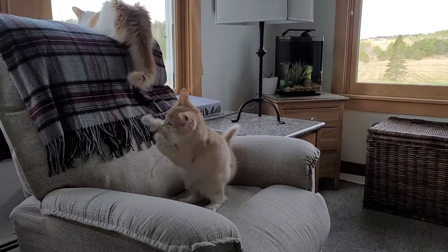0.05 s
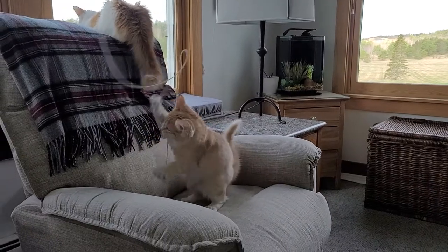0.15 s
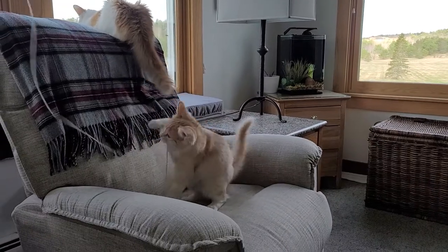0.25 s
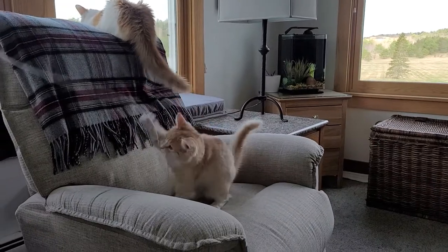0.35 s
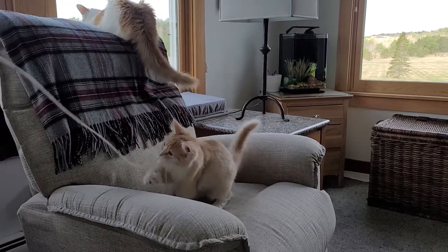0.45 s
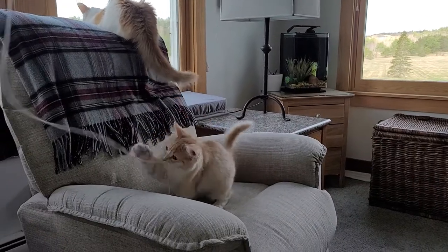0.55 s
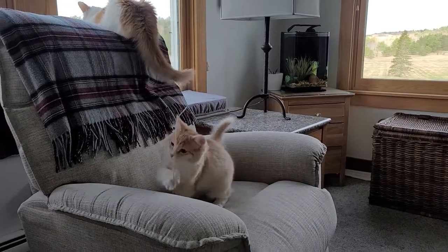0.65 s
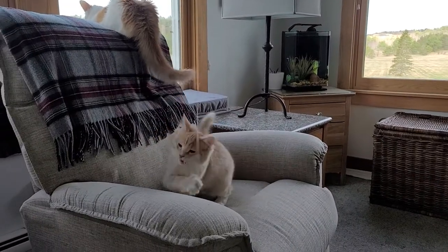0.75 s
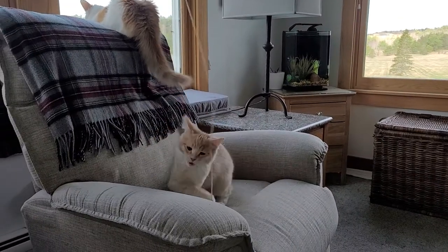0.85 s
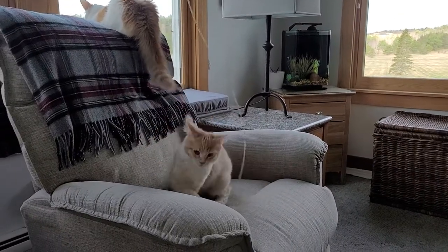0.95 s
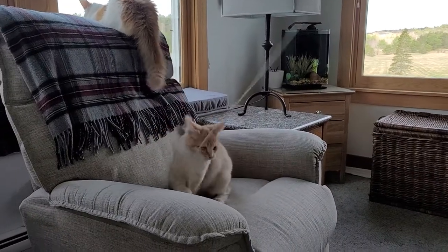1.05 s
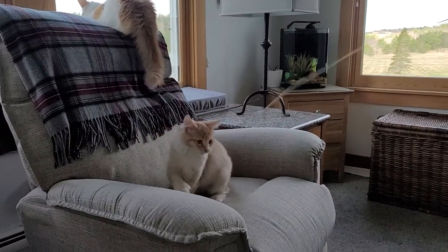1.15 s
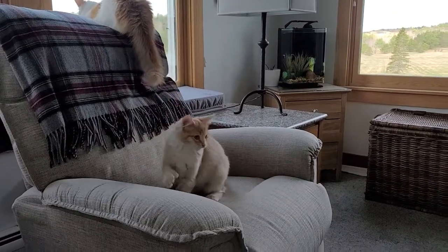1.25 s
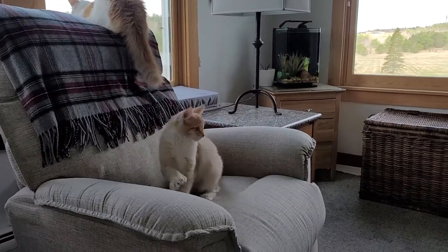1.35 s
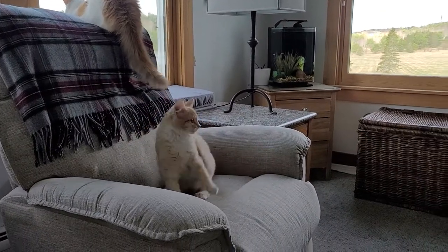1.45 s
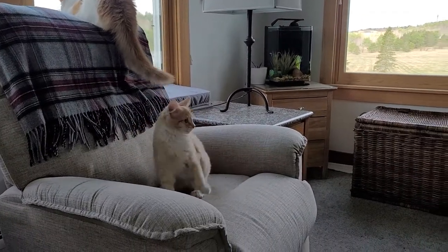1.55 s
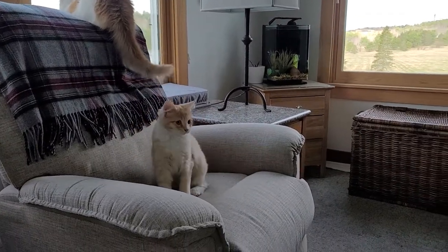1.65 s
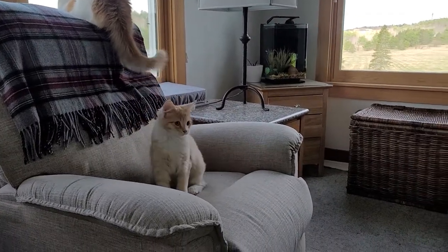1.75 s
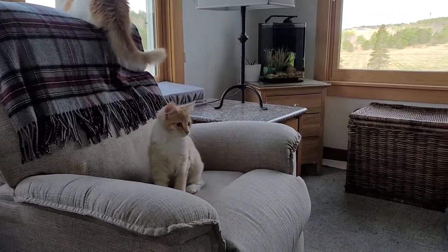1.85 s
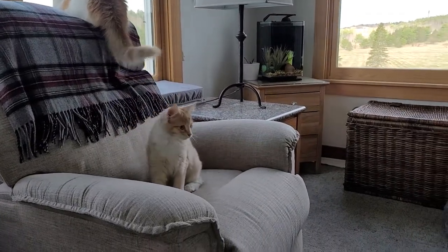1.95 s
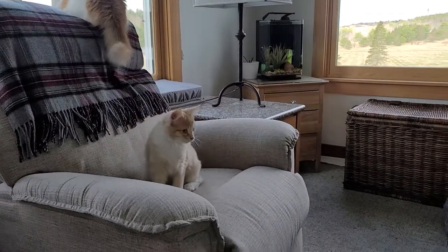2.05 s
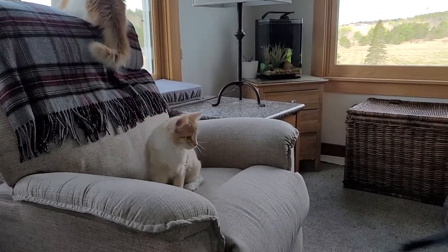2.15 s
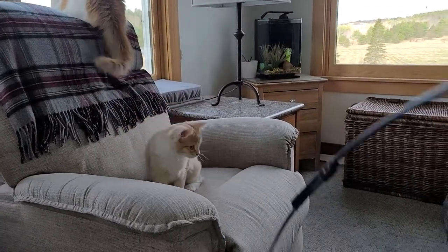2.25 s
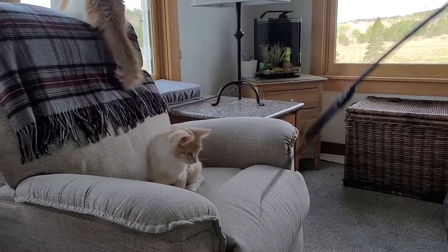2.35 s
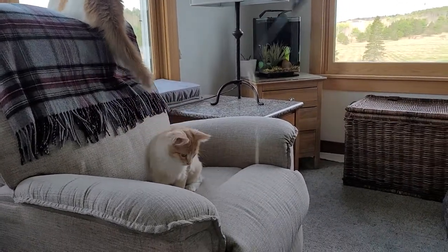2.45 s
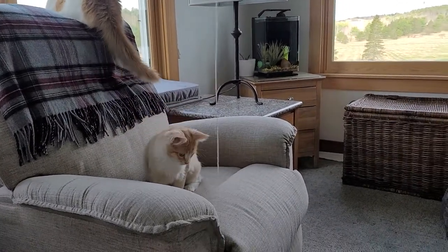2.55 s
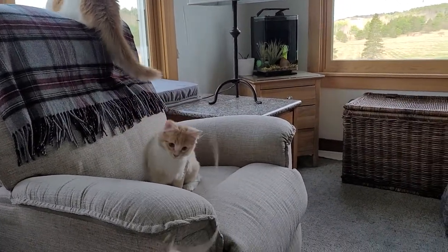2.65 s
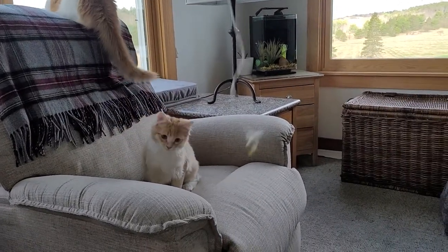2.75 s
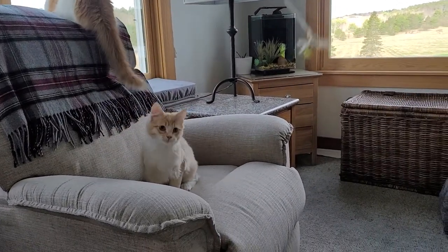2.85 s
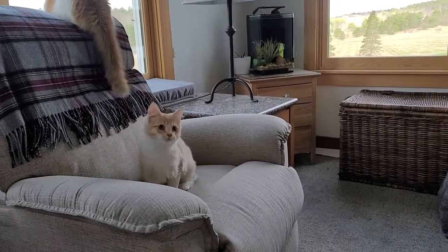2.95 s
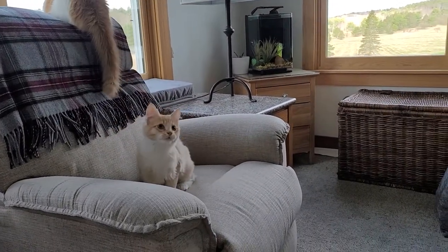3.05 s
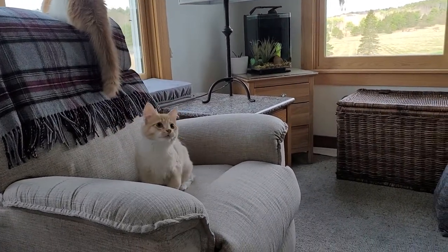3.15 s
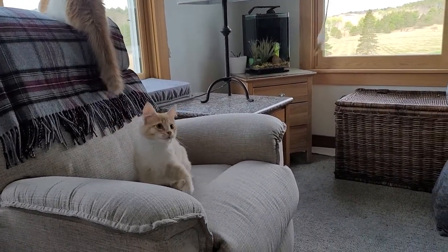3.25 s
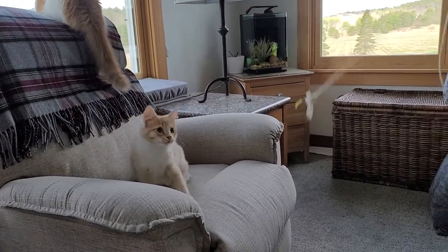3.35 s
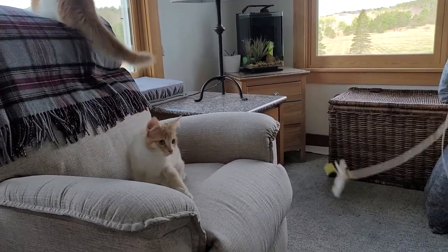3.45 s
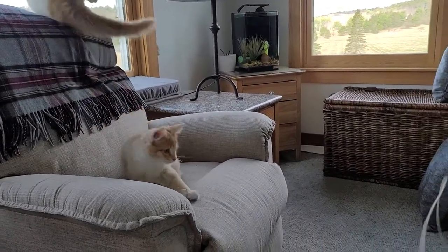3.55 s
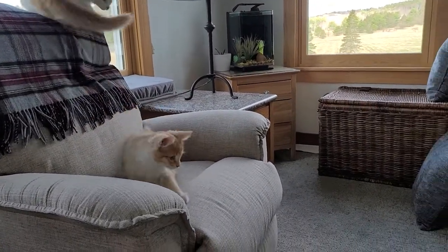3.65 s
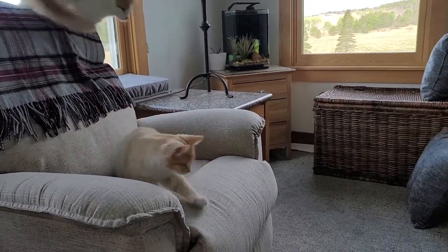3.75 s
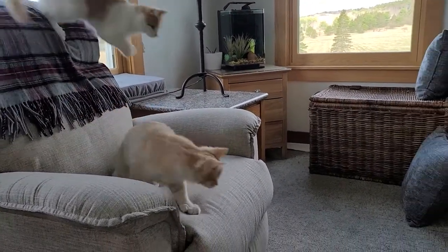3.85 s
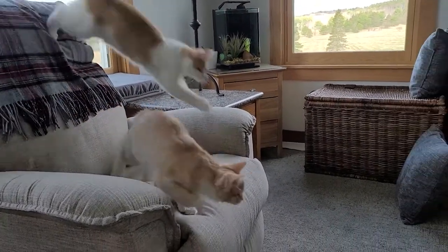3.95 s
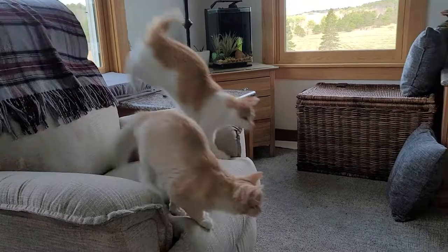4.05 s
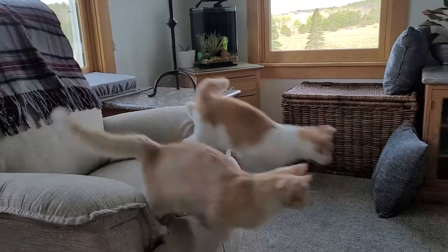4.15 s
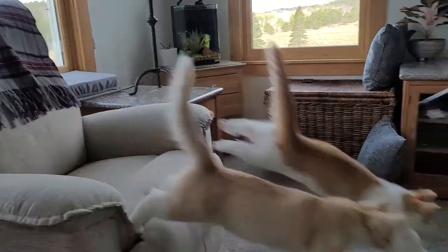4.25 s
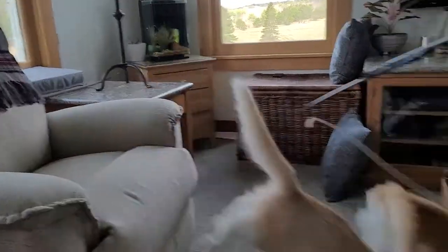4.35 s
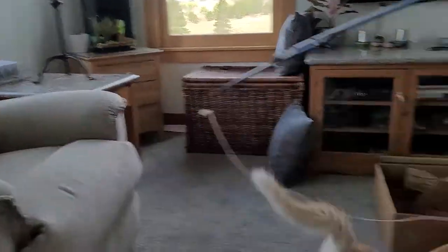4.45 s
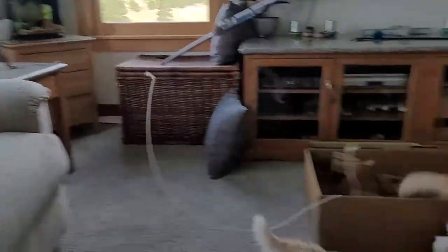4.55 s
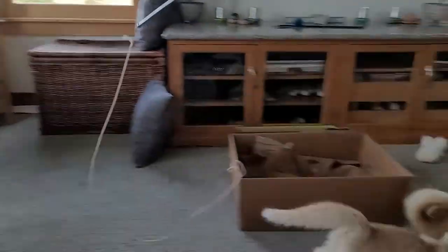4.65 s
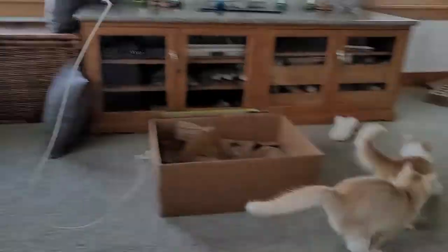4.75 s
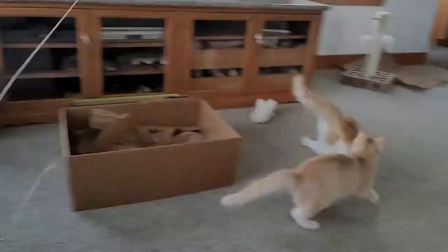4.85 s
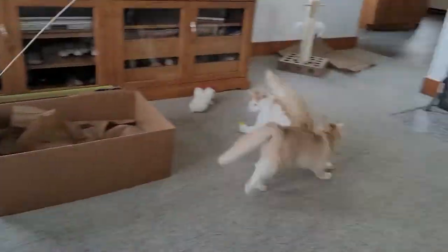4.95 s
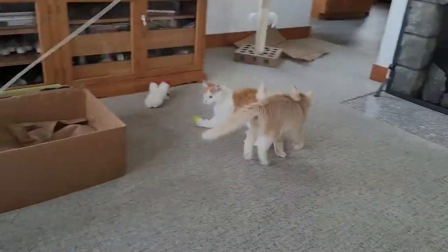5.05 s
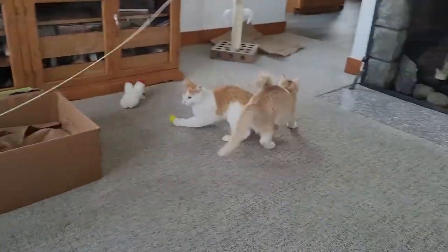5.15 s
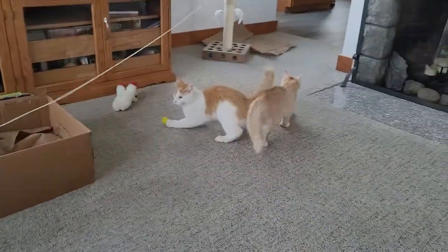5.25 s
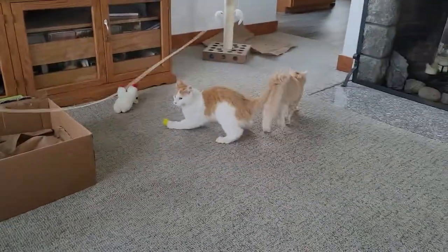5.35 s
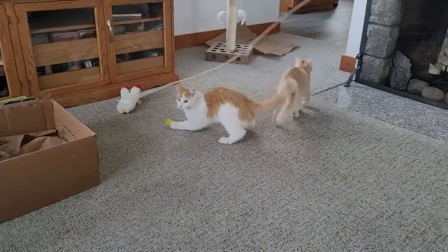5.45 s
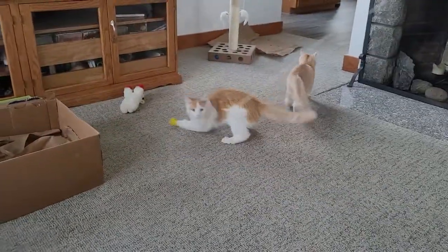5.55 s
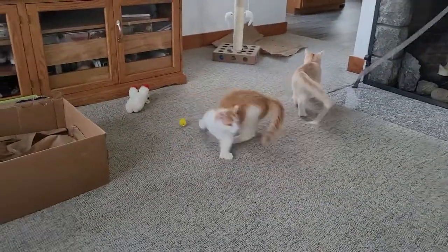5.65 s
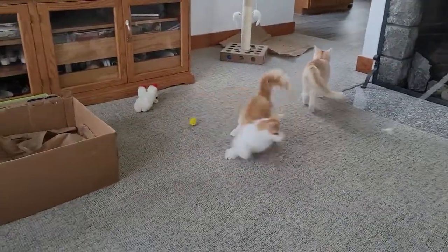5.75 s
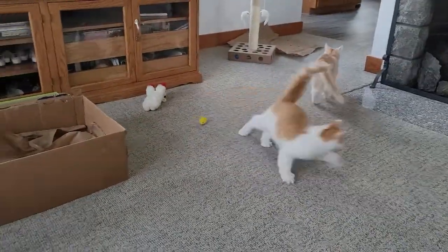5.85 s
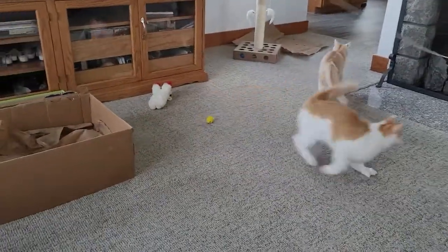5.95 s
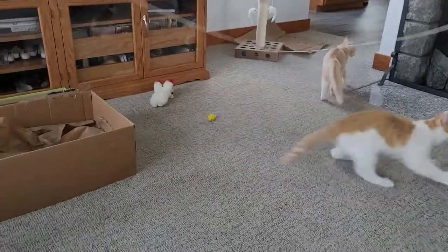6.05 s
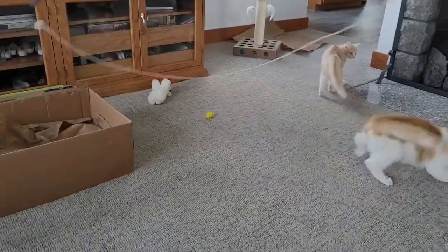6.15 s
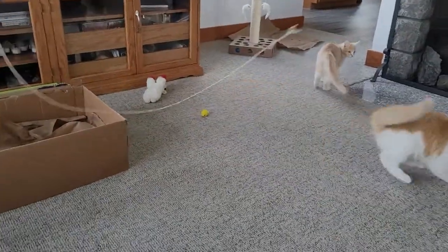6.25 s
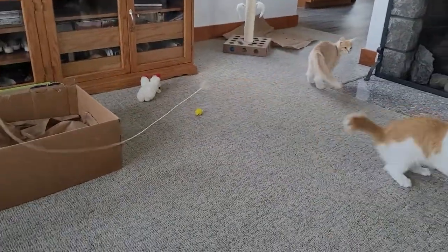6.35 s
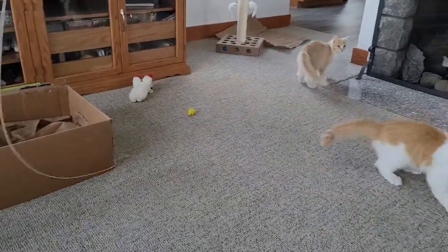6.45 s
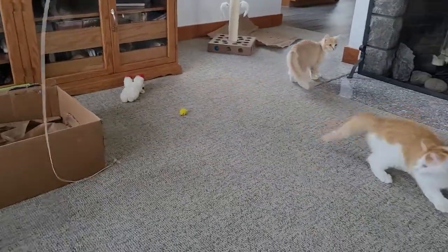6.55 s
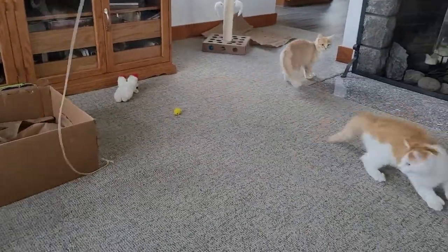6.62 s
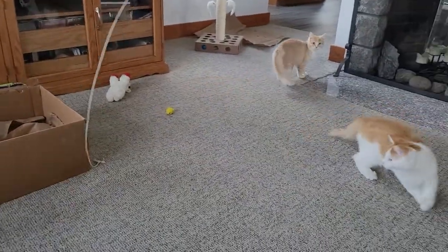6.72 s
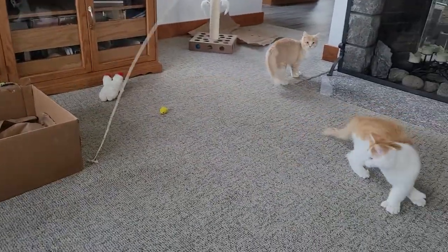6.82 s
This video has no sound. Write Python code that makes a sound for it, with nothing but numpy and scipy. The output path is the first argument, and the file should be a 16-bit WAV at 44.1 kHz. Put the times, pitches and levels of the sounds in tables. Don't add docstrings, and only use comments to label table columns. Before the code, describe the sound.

A low pump hum and soft hiss, a wand toy snapping on an armchair, then two cats leaping with knocks, scuffs and heavy carpet thumps.

```python
import sys
import numpy as np
from scipy import signal
from scipy.fft import rfft, irfft, next_fast_len
from scipy.io import wavfile
from scipy.ndimage import uniform_filter1d

SR = 44100
rng = np.random.default_rng(int(sys.argv[2]) if len(sys.argv) > 2 else 0)


def transcribe(u):
    v = np.clip(np.atleast_2d(u).T, -1, 1)
    q = np.round(v * 32767).astype(np.int16)
    wavfile.write(sys.argv[1], SR, q)


def volts(x):
    e = np.asarray(x, float) / 20
    return 10 ** e


N = 303628
TIME = np.arange(N) / SR
PORT_LAG_MS = 0.42

# (t/s, peak level/dB, f/Hz, ring/cycles)
ON_CHAIR = [(1.194, -40, 85.2, 4.05), (1.571, -43, 88.7, 9.1), (2.236, -32, 278, 15.8),
            (2.297, -21.5, 86, 5), (2.304, -35.5, 201, 7.5), (2.68, -27, 214, 3.4), (2.685, -35.5, 86, 3.2),
            (3.828, -37, 135.5, 3.3), (3.859, -41.5, 80, 3.33), (4.067, -29, 99, 3.6), (4.1, -30, 82, 3.9),
            (4.167, -22, 91.2, 3.2), (4.198, -18, 81.95, 2.64), (4.289, -20, 89, 2.6)]
# (t/s, peak level/dB, f/Hz, ring/cycles)
ON_FLOOR = [(4.39, -21.5, 37.2, 2.6), (4.42, -19.5, 55.2, 5.8), (4.462, -24, 55, 2),
            (4.483, -20.5, 119, 2.3), (4.495, -13.5, 148, 3.8), (4.511, -21.5, 64.8, 5),
            (4.565, -15, 121, 4.3), (4.59, -16, 86, 2.5), (4.608, -28, 110, 6), (4.64, -27, 84, 19),
            (4.679, -23, 214, 5.7), (4.709, -21.5, 58, 3), (4.728, -31.5, 134, 7.4),
            (4.806, -35.5, 56.5, 4.4), (4.828, -32, 152, 2.4), (4.857, -28, 68, 2.6), (4.988, -40, 76, 11),
            (5.239, -46, 253, 6), (5.265, -47, 88.5, 5), (5.322, -47.5, 80, 7.9), (5.608, -40, 81.9, 5.3),
            (5.736, -38.5, 70.4, 4), (5.75, -42, 129, 13), (5.772, -36, 64, 3), (5.788, -41, 62, 4),
            (5.882, -32.5, 278.5, 10.7), (5.903, -34, 213.6, 8.8), (5.97, -35, 60, 4.4),
            (6.074, -32, 70, 2), (6.089, -27.5, 71.9, 3.2), (6.131, -26, 95.5, 2.5),
            (6.16, -31.5, 70.5, 1.8), (6.174, -28, 68.6, 3.9), (6.132, -34.5, 287, 11),
            (6.528, -34, 73.5, 2.4), (6.544, -37, 75.4, 3.1), (6.57, -45, 90, 4.9)]


def unit(x):
    return x / np.sqrt(np.mean(x ** 2))


def on_log(table, hz):
    f, v = np.transpose(table)
    return np.interp(np.log(np.maximum(hz, 1)), np.log(f), v)


def curves(rows):
    s, *columns = np.transpose(rows)
    return [np.interp(TIME, s, c) for c in columns]


def band(x, lo_hz, hi_hz, order=2):
    sos = signal.butter(order, [lo_hz, min(hi_hz, 0.45 * SR)], "band", fs=SR, output="sos")
    return signal.sosfilt(sos, x)


def diffuse(size, colour=((20, 0), (20000, 0))):
    # (f/Hz, left-right correlation)
    likeness = [(60, 0.42), (130, 0.87), (290, 0.12), (640, -0.42), (1400, -0.47), (3100, -0.16),
                (15000, -0.18)]
    fast = next_fast_len(size, True)
    hz = np.fft.rfftfreq(fast, 1 / SR)
    like = np.clip(on_log(likeness, hz), -0.99, 0.99)
    mid, side = rfft(rng.standard_normal((2, fast))) * volts(on_log(colour, hz))
    mid = mid * np.sqrt((1 + like) / 2)
    side = side * np.sqrt((1 - like) / 2)
    return irfft(np.array([mid + side, mid - side]), fast)[:, :size]


def walk(rate):
    k = int(SR / rate)
    steps = np.repeat(rng.standard_normal(N // k + 1), k)
    return 1.22 * uniform_filter1d(uniform_filter1d(steps, k), k)[:N]


def add(track, s, sound):
    i = int(s * SR)
    track[i:i + len(sound)] += sound[:N - i]


def add_swell(power, s, db, rise_s, fall_s):
    rise_s, fall_s = np.clip(rise_s, 0.003, 0.3), np.clip(fall_s, 0.01, 0.6)
    t = np.arange(-2 * rise_s, 2 * fall_s, 1 / SR)
    below_peak_db = 30 * np.where(t < 0, -t / rise_s, t / fall_s)
    add(power, s - 2 * rise_s, volts(db - below_peak_db) ** 2)


def thumps():
    out, t = np.zeros(N), np.arange(SR // 4) / SR
    for s, db, hz, cycles in list(ON_CHAIR) + list(ON_FLOOR):
        turns = hz * t
        shape = (1 - np.exp(-turns / 0.29)) * np.exp(-3 * turns / np.clip(cycles, 1, 12))
        add(out, s, volts(db) * shape * np.sin(2 * np.pi * turns * (1 - 0.055 * t)))
    return out


def scuffs():
    # (peak t/s, level/dB, rise by 30 dB/s, fall by 30 dB/s, brightness/dB per layer)
    pawing = [(3.825, -47, -0.1, 0.5, 1), (4.02, -54.5, 0.5, 0.3, 3), (4.07, -40, -0.8, 0.5, -6),
              (4.11, -37.5, 0.1, 1, 1.5), (4.388, -32, -0.35, .17, -0.5), (4.48, -32.5, -0.86, 0.1, -2),
              (4.555, -29, 0, 0.34, -1), (4.685, -36, -1, 0.15, 0), (4.806, -39, -0.3, 0.18, -4),
              (4.911, -47.5, 0, -1.5, 1.5), (4.991, -51, 0.7, 0.47, 5.5), (5.217, -50.5, 0.5, -0.14, -2),
              (5.737, -46.5, 0, 2, -1), (5.8, -54.5, -0.5, 6, 5), (5.885, -47.5, -1.5, 7, 2),
              (6.072, -53, -3, -2.5, -1), (6.14, -44.5, -2.3, -0.47, -0.5), (6.17, -42.5, 4, -0.13, -2),
              (6.515, -53, 0.2, .25, 3.5)]
    clawing = [(2.66, -44, 0.011, 0.033, -2), (2.673, -44, 0.0066, 0.029, 7.5),
               (2.683, -35.5, 0.0072, 0.06, 0), (2.709, -46, 0.02, 0.053, -11),
               (4.13, -47.5, 0.086, 0.17, -1), (4.205, -35.5, 0.049, .2, -2.5),
               (4.25, -36.5, 0.035, 0.14, 1.5), (4.278, -32.5, 0.038, 0.17, -0.5),
               (5.612, -48.5, 0.01, 0.11, -33), (5.935, -53.5, 0.01, 0.18, -2.5),
               (5.745, -54, 0.024, 0.068, -9)]
    scraping = [
        (3.892, -55.5, 0.0083, 0.16, 3.5),
        (4.485, -60.5, 0.045, 0.21, 4.5),
        (4.575, -54.5, .03, 0.52, 2.5),
        (4.706, -47.5, 0.024, 0.15, 1),
        (5.268, -49, 0.016, 0.1, -2.5),
        (5.285, -48, 0.027, 0.15, -6),
        (5.61, -49.5, 0.0073, 0.15, 2.5),
        (6.14, -63, 0.03, 0.23, 2),
    ]
    whipping = [
        (2.225, -52, 0.066, .05, -1.5),
        (2.242, -32.5, 0.016, 0.17, -0.84),
        (2.33, -64, 0.047, 0.082, -7),
        (2.56, -58, 0.21, 0.36, -8),
        (5.255, -66, 0.028, 0.1, 3.5),
    ]
    rustling = [
        (4.831, -59.5, .005, 0.26, 2.1),
        (4.86, -58, 0.06, 0.19, 1.5),
        (4.915, -69, 0.066, 0.082, 2.4),
        (6.4, -93, 0.028, 0.18, 4.4),
    ]
    toy_shakes = [
        (2.555, -62.5, .15, .08, -1.5),
        (6.462, -64.5, 0.028, 0.055, 0.37),
        (6.522, -71.5, 0.046, 0.082, 1.9),
        (6.623, -79.5, 0.054, .1, .6),
    ]
    # (padding/dB, weave/dB, rattle/dB, fur/dB)
    scrape = (-9, -0.5, -12, -21.5)
    toy = (-8, -5, 1.5, -3)
    paw, claw = (0, -23, -35.5, -47), (2.5, -2, -22.5, -60)
    whip, rustle = (4.5, 3.5, -4, -4.5), (-12, -2.5, -2.5, 1)
    fade = (0.92, 0.79, 0.69, 0.55)
    # (lowest f/Hz, highest f/Hz)
    layer_hz = ((230, 800), (1050, 2700), (4300, 6800), (8300, 16000))
    # (level/dB, changes of patchiness/per s, patchiness/dB)
    grains = [(-5.5, 99, 2.5), (0.93, 200, 2.5), (0.2, 200, 3), (-3.5, 160, 1)]

    kinds = ((pawing, paw), (clawing, claw), (scraping, scrape),
             (whipping, whip), (rustling, rustle), (toy_shakes, toy))
    power = np.zeros((4, N))
    for rows, colour in kinds:
        for s, db, rise_s, fall_s, bright_db in rows:
            for k in range(4):
                add_swell(power[k], s, db + colour[k] + k * bright_db, rise_s, fall_s * fade[k])

    catches = (rng.random(N) < 2500 / SR) * rng.standard_normal(N)
    fibres = diffuse(N) + 0.35 * unit(catches)
    out = np.zeros((2, N))
    for p, (lo_hz, hi_hz), (db, rate, patchy_db) in zip(power, layer_hz, grains):
        grain = unit(volts(patchy_db * walk(rate)) * band(fibres, lo_hz, hi_hz, order=3))
        out += volts(db) * uniform_filter1d(np.sqrt(p), size=90) * grain
    return out


def knocks():
    # (t/s, body level/dB, body f/Hz, snap level/dB, snap f/Hz)
    sharp = [(0.253, -35.5, 355, -57, 1300), (4.238, -28, 1010, -42, 2180), (2.239, -34.5, 690, -34, 1990),
             (2.294, -27, 587, -41.5, 1280), (2.615, -51.5, 1138, -54.5, 1320),
             (2.664, -34, 825, -43, 2070), (2.666, -46, 790, -43, 2510), (2.670, -42, 806, -55, 2600),
             (2.6772, -27.5, 600, -37, 1828), (2.6795, -42, 590, -46.5, 2770), (2.688, -43, 477, -53, 1920),
             (2.707, -49, 598, -59.5, 2200), (3.89, -46, 690, -56, 2760), (4.066, -40.5, 560, -55.5, 1240),
             (4.126, -60.5, 545, -51.5, 1500), (4.192, -39, 685, -37.5, 1960),
             (4.198, -35.5, 610, -36, 1290), (4.211, -41, 714, -35.5, 1500),
             (4.2376, -21.5, 740, -26.5, 1370), (4.245, -45.5, 800, -35.5, 2180),
             (4.2644, -12, 651, -24, 1320), (4.2715, -22.5, 811, -25.5, 1420),
             (4.275, -16.5, 865, -30, 1850), (4.282, -25.5, 920, -33.5, 1490),
             (4.2905, -29, 1020, -37, 1860), (4.294, -26.5, 750, -29.5, 1250),
             (4.301, -34, 870, -33.5, 1940), (4.313, -40, 690, -37, 1980), (4.704, -36.5, 515, -51, 2300),
             (5.607, -40, 420, -53, 1740), (5.797, -61, 700, -59, 1200), (5.933, -48, 500, -60, 2020),
             (5.621, -46.5, 610, -51, 1780)]
    # (t/s, body level/dB, body f/Hz)
    dull = [(2.549, -46, 1150), (2.557, -51, 1250), (2.562, -50, 1190), (2.609, -52.5, 1200),
            (3.8224, -33, 400.5), (3.838, -42.5, 398), (3.853, -42, 330), (3.905, -48, 780),
            (4.018, -53.5, 603.5), (4.385, -29.5, 330), (4.399, -31.5, 298), (4.462, -32, 380),
            (4.493, -29, 330), (4.503, -33.5, 425), (4.561, -28, 450), (4.589, -40, 445), (4.601, -36, 415),
            (4.812, -32.5, 370), (5.635, -45, 450), (6.142, -44, 498), (6.158, -41, 450), (6.177, -39, 420),
            (4.474, -22.5, 345), (4.549, -30.5, 730), (5.879, -52.5, 503), (4.803, -31, 353),
            (4.909, -36.5, 340), (4.989, -43.5, 400), (5.214, -42.5, 634), (5.222, -44, 562),
            (5.235, -49, 483), (5.243, -44.5, 398), (5.25, -53, 450), (6.527, -45.5, 301),
            (6.539, -44, 398.7), (5.722, -49, 415), (6.07, -44, 385), (6.128, -34, 355),
            (6.511, -48.5, 389)]
    sharp_t60_s, dull_t60_s = 0.016, 0.017
    dull_snap_db, dull_snap_hz = -35.5, 1250
    rows = [(*row, sharp_t60_s) for row in sharp]
    rows += [(s, db, hz, db + dull_snap_db, dull_snap_hz, dull_t60_s) for s, db, hz in dull]

    out, t = np.zeros(N), np.arange(SR // 12) / SR
    onset = 1 - np.exp(-t / 0.00044)
    for s, db, hz, snap_db, snap_hz, t60 in rows:
        body = np.sin(2 * np.pi * hz * t) * np.exp(-np.log(1000) * t / t60)
        snap = np.sin(2 * np.pi * snap_hz * t) * np.exp(-t * snap_hz / 0.98)
        add(out, s + 0.001812, -onset * (volts(db + 4.5) * body + volts(snap_db + 20) * snap))
    return out


def ticks():
    # (t/s, peak level/dB, f/Hz, left minus right/dB)
    airy = [
        (2.2374, -17.5, 5200, -3.5),
        (0.397, -64, 8500, -2.5),
        (0.31, -67, 5200, -3.5),
        (0.38, -63, 6600, -2),
        (0.42, -55.5, 5100, -2.5),
        (0.42, -53.5, 7200, -3),
        (4.5, -53, 3250, 17),
        (2.657, -56, 7700, 13),
    ]
    medium = [(2.601, -56.5, 5600, -0.5), (3.889, -52.5, 3220, 0), (3.899, -50, 2200, -1.5),
              (2.679, -52, 6900, 0), (3.894, -45, 2950, -1), (4.2772, -45.5, 3220, 6),
              (4.8241, -61, 5028, -6), (5.6085, -50, 3200, 4), (5.624, -47.5, 2930, -1),
              (4.8305, -49, 14600, -4), (2.551, -54, 5560, -1), (2.567, -58, 5600, 0),
              (6.446, -64, 6530, 0), (6.453, -54, 6040, -0.5), (6.4583, -54.5, 6525, 6),
              (6.472, -61, 6300, 3), (6.51, -61, 6500, -2), (6.531, -63, 6440, -1.5), (6.634, -72, 6550, 0),
              (6.4644, -60.5, 7040, 8), (6.5171, -58.5, 6560, -5), (6.5246, -61, 6100, 4),
              (6.6164, -62, 6400, -0.6)]
    plain = [(1.4135, -46.5, 4560, -2.5), (1.414, -52, 6500, 0), (2.5216, -51, 6234, 2),
             (2.6174, -33.5, 3220, -0.5), (2.618, -38, 4700, -2.5), (2.6815, -35, 3140, 2),
             (2.6653, -29, 3260, 1.5), (2.6774, -53, 3000, 9), (4.2395, -30, 3130, -2),
             (4.2665, -38, 3420, 3), (4.7045, -38.5, 3920, -1)]
    # (t/s, peak level/dB, f/Hz, left minus right/dB, fall by 60 dB/s)
    wand_taps = [(1.416, -43, 2510, -1, 0.0019), (2.237, -17.5, 1961, -0.5, 0.021),
                 (2.2371, -23.5, 7150, -3, 0.0034), (2.241, -27, 2043, 2.5, 0.012),
                 (2.254, -31.5, 1590, 12, 0.024), (2.259, -34, 2220, 2.5, 0.012),
                 (2.264, -31.5, 1480, 6, 0.017), (2.278, -35, 1960, -2, 0.015),
                 (2.2477, -19, 1820, -1, 0.006), (2.6809, -31, 1640, 6, 0.0033),
                 (5.264, -53, 3296, 2.2, .02), (5.278, -43.5, 1580, -8, 0.015),
                 (5.279, -54, 2710, -2, 0.016), (5.298, -55, 1504, -3, 0.014),
                 (6.46, -64.5, 4537, 0.5, .03), (4.707, -46, 2460, -0.3, 0.045)]
    sorts = ((airy, (-11, 0.0032)), (medium, (-25.5, 0.011)), (plain, (-37, 0.0015)))
    tap_air_db = -35.5
    rows = [(*row, *sort) for table, sort in sorts for row in table]
    rows += [(*row[:4], tap_air_db, row[4]) for row in wand_taps]

    out, t = np.zeros((2, N)), np.arange(SR // 10) / SR
    spit = band(rng.standard_normal((len(rows), len(t))), 6700, 12500)
    for (s, db, hz, pan_db, air_db, t60), noise in zip(rows, spit):
        fall = np.exp(-np.log(1000) * t / np.clip(t60, 0.002, 0.12))
        note = np.sin(2 * np.pi * hz * t)
        sound = volts(db + 3.5) * fall * (note + volts(air_db + 12.5) * noise)
        late_s = np.clip(-pan_db / 4, 0, 1) * PORT_LAG_MS / 1000
        add(out[0], s + late_s, volts(pan_db / 2) * sound)
        add(out[1], s, volts(-pan_db / 2) * sound)
    return out


def boards():
    shudder_db, shudder_t60_s = (-13, -13.5), (0.56, 0.21)
    hand_db, hand_from_s = -55.5, 4.05
    power = np.zeros((2, N))
    rumble_db = hand_db - 3.5 * (TIME - hand_from_s) + 1.7 * walk(7.1)
    power[0] = (TIME > hand_from_s) * volts(rumble_db) ** 2
    for s, db, hz, cycles in list(ON_CHAIR[9:]) + list(ON_FLOOR):
        k = int(hz > 82)
        add_swell(power[k], s + 0.012, db + shudder_db[k], 0.035, shudder_t60_s[k] / 2)
    shudder = rng.standard_normal(N) + 0.4 * rng.standard_normal((2, N))
    deep = np.sqrt(power[0]) * unit(band(shudder, 28.2, 68.4))
    boom = np.sqrt(power[1]) * unit(band(shudder, 78.0, 199.5))
    return deep + boom


def bird():
    # (t/s, f/Hz, level/dB, scoop/Hz)
    peeps = [
        (0.045, 7840, -77.5, 598),
        (0.24, 2990, -78.5, 34),
        (0.7, 3880, -83, 0),
        (1.58, 7530, -79, 502),
        (4.9, 2968, -71.5, 0),
    ]
    peep_s, scoop_s, rise_s, t60_s = 0.15, 0.023, 0.025, 0.4
    out, t = np.zeros(N), TIME[:int(peep_s * SR)]
    flutter_db, waver_hz = 3 * walk(76.6), 90 * walk(220)
    shape = np.minimum(t / rise_s, 1) * volts(-60 * np.maximum(t - rise_s, 0) / t60_s)
    for k, (s, hz, db, scoop_hz) in enumerate(peeps):
        part = slice(k * len(t), (k + 1) * len(t))
        pitch = hz - scoop_hz * np.exp(-t / scoop_s) + waver_hz[part] * hz / 7800
        whistle = np.sin(2 * np.pi * np.cumsum(pitch) / SR)
        add(out, s, np.sqrt(2) * volts(db + flutter_db[part]) * shape * whistle)
    return out


def pump():
    # (t/s, f/Hz, level/dB)
    motor = [(0.0, 85.2, -51), (0.25, 84.1, -53.5), (0.57, 85.6, -50), (1.15, 86.3, -51.5),
             (1.77, 86.7, -53), (1.87, 86.5, -50.5), (2.3, 86.5, -55), (2.45, 87.1, -50.5), (2.8, 88, -55),
             (3.12, 88.8, -49), (3.44, 88, -56.5), (3.6, 89.1, -52.5), (4.05, 87.4, -53), (4.6, 86, -45),
             (5.2, 81.9, -65), (6.9, 84, -62.5)]
    # (f/Hz, width/Hz, level/dB)
    drones = [(61.9, 13, -64.5), (89.8, 38, -61.5), (119.1, 4.1, -67), (494, 37, -88), (1276, 160, -71.5)]
    hz, db = curves(motor)
    turning = np.sin(2 * np.pi * np.cumsum(hz + 1.5 * walk(17)) / SR)
    out = np.sqrt(2) * volts(db + 1.5 * walk(14)) * turning
    shake = diffuse(N)
    facing_db = np.interp(TIME, [4.4, 5.0], [0, -4])
    for f, width, level_db in drones:
        out = out + volts(level_db + facing_db) * unit(band(shake, f - width / 2, f + width / 2))
    return out


def air():
    # (f/Hz, level per Hz/dB)
    colour = [(28, -11.5), (50, -26), (130, -15), (172, -4.5), (263, -10.5), (452, -5), (859, -8),
              (1030, -17), (1700, -12.5), (2080, -21), (3870, -29), (7000, -34), (8000, -47.5), (9400, -48),
              (11300, -40.5)]
    # (t/s, level/dB)
    loudness = [(0, -60.5), (2, -62), (3.3, -62.5), (5, -62.5), (6.9, -64.5)]
    return volts(curves(loudness)[0] + 0.93 * walk(9.1)) * unit(diffuse(N, colour))


def room():
    # (f/Hz, fall by 60 dB/s)
    tail_t60 = [(100, 0.45), (500, 0.45), (2000, 0.22), (6000, .22), (15000, 0.115)]
    # (delay/ms, level/dB)
    echoes = [(1.7, -12), (7.2, -15), (11, -15), (18, -17), (29, -19)]
    tail_db = -8.5
    t = np.arange(SR // 3) / SR
    noise = diffuse(len(t))
    tail = np.zeros((2, len(t)))
    for f in 85.0 * 2 ** np.arange(9.):
        octave = band(noise, f / np.sqrt(2), f * np.sqrt(2), order=1)
        tail += octave * np.exp(-np.log(1000) * t / on_log(tail_t60, f))
    tail = tail * (1 - np.exp(-t / 0.0032))
    out = volts(tail_db) * tail / np.sqrt(np.sum(tail ** 2) / 2)
    out[:, 0] += 1
    for k, (ms, db) in enumerate(echoes):
        near = k % 2
        out[near, int(ms * SR / 1000)] += volts(db)
        out[1 - near, int((ms + 0.6 * PORT_LAG_MS) * SR / 1000)] += volts(db)
    return out


def scene():
    hits = knocks() + ticks()
    wet = np.where(TIME < 1.5, 0.3, 1)
    echoing = signal.fftconvolve(wet * hits + bird(), room(), axes=1)[:, :N]
    struck = echoing + (1 - wet) * hits
    return thumps() + scuffs() + struck + boards() + pump() + air()


def roll_off(x):
    return signal.sosfilt(signal.butter(12, 16770, fs=SR, output="sos"), x)


def record(dry):
    x = signal.sosfilt(signal.butter(2, 22, "high", fs=SR, output="sos"), dry)
    x = signal.sosfilt(signal.ellip(8, 0.2, 70, 16000, fs=SR, output="sos"), x)
    return roll_off(x)


dry = scene()
out = record(dry)
transcribe(out)
```